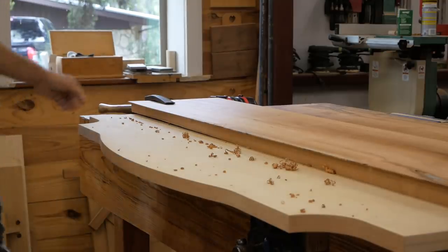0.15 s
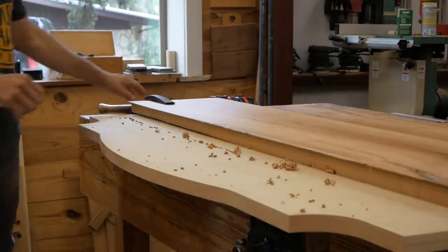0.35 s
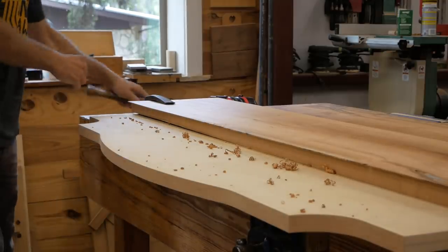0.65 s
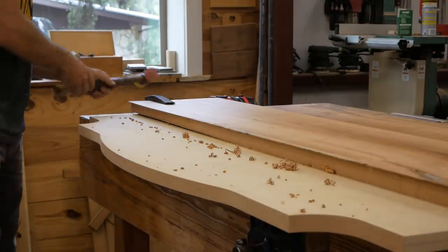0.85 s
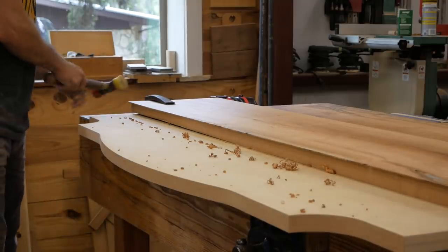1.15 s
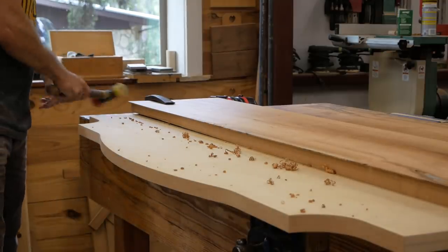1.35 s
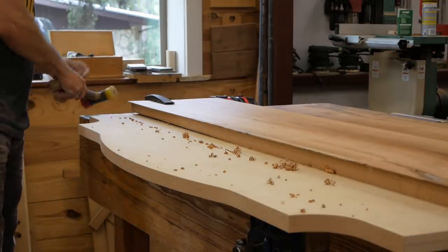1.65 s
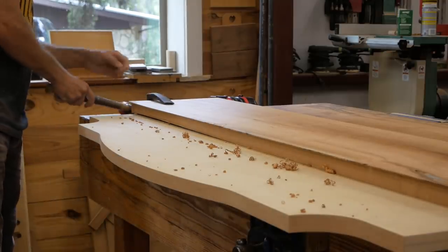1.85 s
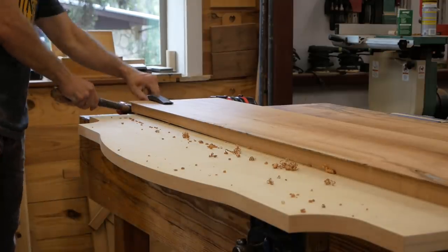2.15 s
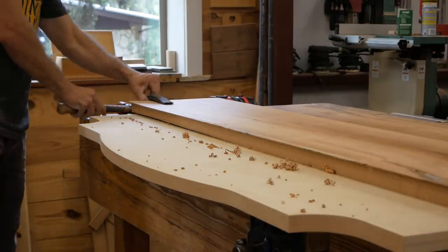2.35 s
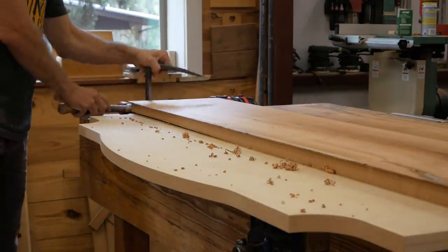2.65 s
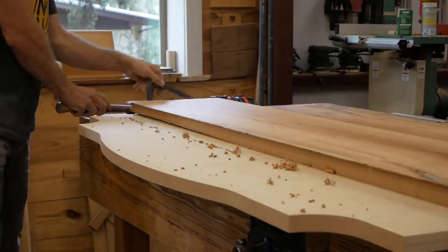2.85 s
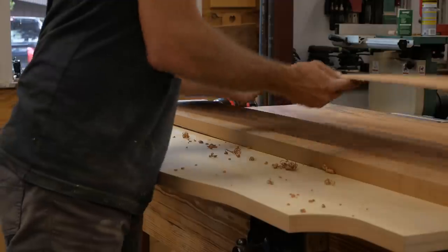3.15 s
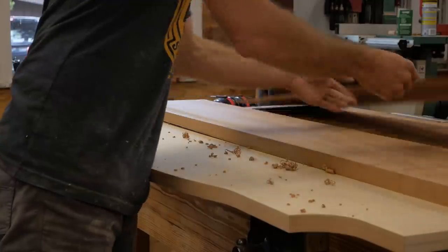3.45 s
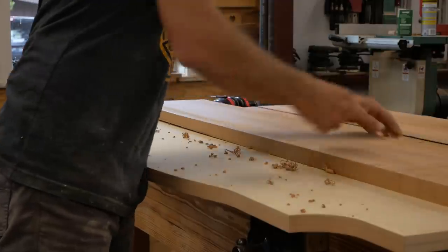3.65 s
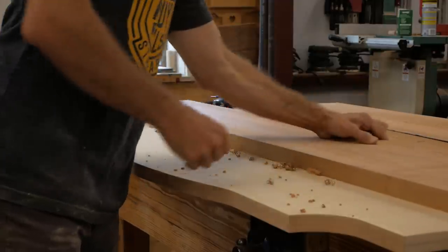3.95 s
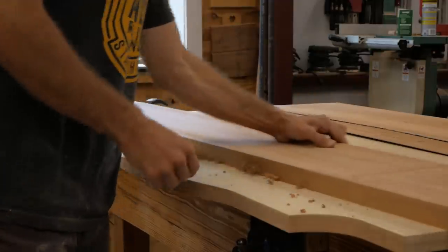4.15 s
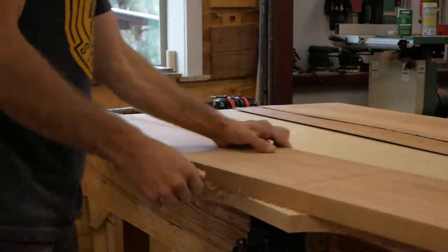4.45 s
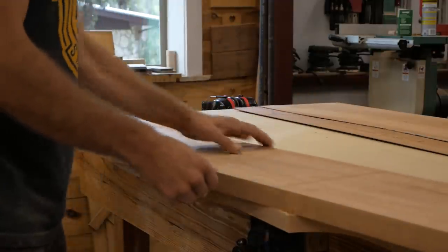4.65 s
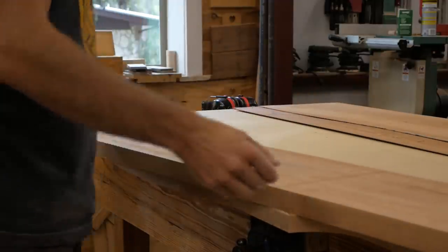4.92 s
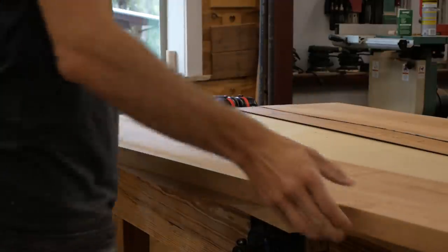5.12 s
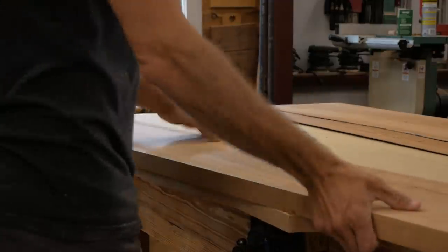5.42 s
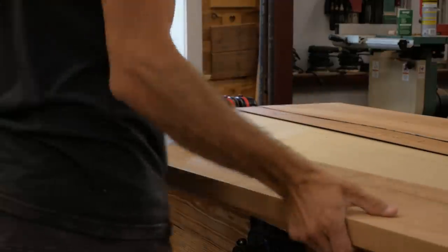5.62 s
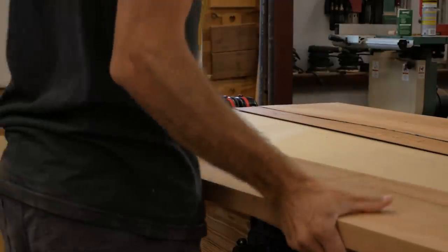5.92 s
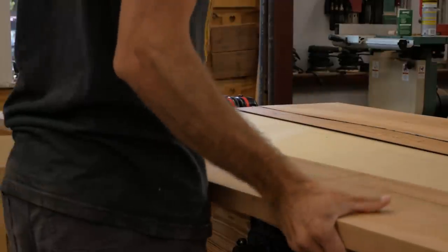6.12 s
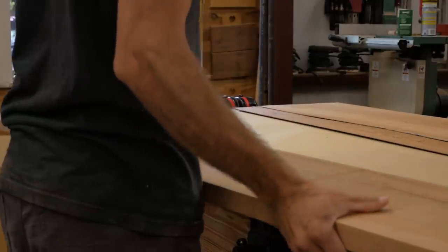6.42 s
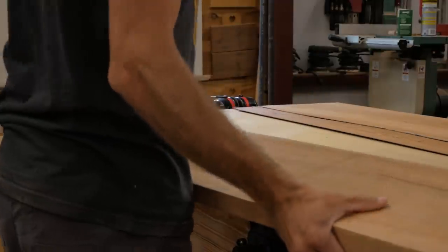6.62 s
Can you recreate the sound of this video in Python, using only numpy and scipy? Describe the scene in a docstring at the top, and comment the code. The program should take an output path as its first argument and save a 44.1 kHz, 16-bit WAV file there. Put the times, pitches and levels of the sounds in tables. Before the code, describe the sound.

A quiet small workshop with a low, soft room hush, heard close and almost centred. From 0 to 0.4 s cloth rustles gently; near 0.6 s a tool is picked up with faint knocks and a low shudder, with more rustling to 1 s. At 1.48 and 1.83 s two heavy mallet blows dominate, hard woody cracks with a delayed thump, slight iron ring and short room tail. Dull knocks cluster at 1.9-2.1 s, then tiny clacks and a faint rattle until 2.85 s as the iron holdfast comes out. Soft contacts follow around 3 s. A thin sheet snaps down at 3.5 s and claps harder at 3.65 s, skidding briefly. From 3.9 to 4.6 s a plank scrapes and judders, with a soft thud at 4.48 s. A light swipe at 4.8 s precedes a stronger, gritty hand swish at 5.1-5.5 s, falling in pitch. Faint rubs near 5.6 and 6.6-6.8 s end it.

```python
"""Two heavy mallet blows ring out in a small woodworking shop, then loose knocks, claps, scrapes, swishes and rustles.
The blows free an iron holdfast, which knocks about in its hole as it is drawn out; struck parts are clicks and fading tones.
A thin wooden sheet is lifted and slaps down, a plank slides on the bench, and a hand sweeps over the dusty wood.
All rubbing, clothes included, is made of tiny random catches that grow with speed. The room adds a short ring."""
import sys
import numpy as np
from scipy import signal
from scipy.fft import irfft
from scipy.io import wavfile
from scipy.ndimage import uniform_filter1d

SR = 44100
rng = np.random.default_rng(int(sys.argv[2]) if len(sys.argv) > 2 else 0)


def bounce(signal):
    """Save signal as a 16-bit WAV file at the path given by the first command-line argument."""
    frames = np.transpose(np.atleast_2d(signal))
    limited = np.clip(frames, -1, 1)
    pcm = np.round(limited * 32767).astype(np.int16)
    wavfile.write(sys.argv[1], SR, pcm)


N = 299030
TIME = np.arange(N) / SR

# Tones of the struck iron holdfast: f/Hz, relative level/dB, time to fade by 60 dB t60/s
IRON_TONES = [(1070, 4, .25), (1251, 4, .27), (1320, -3, .45), (1442, 0, .3), (1521, -1, .33),
              (1921, -5, .38), (2205, -5, .3), (2595, -2, .3), (3941, -10, .38), (4759, -9, .35),
              (5254, -9, .45), (6255, -12, .37), (7413, -7, .62)]
# Tones of the struck bench: f/Hz, relative level/dB, t60/s
BENCH_TONES = [(169, -12, .3), (213, -7, .22), (242, -6, .22), (277, -5, .26), (312, -6, .2),
               (372, -3, .16), (436, -2, .17), (500, -1, .13), (580, -2, .15), (617, -4, .18),
               (657, -6, .16), (712, -5, .2), (781, -7, .18), (935, -13, .18)]
# Spectrum of a dull wooden thud: f/Hz, relative level/dB
THUD_COLOUR = [(30, -45.5), (70, -25), (120, -11.5), (210, 5.5), (430, 5), (700, -2), (950, -20.5),
               (1400, -27.5), (4000, -55.5)]
# Spectrum of a bright wooden clack: f/Hz, relative level/dB
CLACK_COLOUR = [(200, -29), (600, 1), (950, 3.5), (1350, -4), (1800, -1.5), (2800, -7.5), (4000, -20.5),
                (8000, -30), (15000, -37)]
# Spectrum of wood shuddering as it sticks and slips: f/Hz, relative level/dB
JUDDER_COLOUR = [(50, -45), (80, 3.5), (100, -1), (130, -4), (230, -5.5), (290, 1), (335, 7.5), (400, -7),
                 (600, -5), (1500, -91)]


def amp(db):
    """Turns decibels into a gain."""
    return 10 ** (np.asarray(db) / 20)


def read(points, hz):
    """Reads a table between its points, on a log-frequency axis."""
    f, value = np.transpose(points)
    return np.interp(np.log(hz + 1), np.log(f + 1), value)


def evened(x):
    """Scales a sound to an average (rms) level of 1."""
    return x / np.sqrt(np.mean(x ** 2) + 1e-20)


def crested(x):
    """Scales a sound so that its loudest 6 ms have rms 1."""
    power = uniform_filter1d(x ** 2, size=260, mode="constant")
    return x / np.sqrt(power.max() + 1e-20)


def add(mix, s, sound):
    """Mixes a sound in at time s."""
    part = mix[max(round(s * SR), 0):][:len(sound)]
    part += sound[:len(part)]


def click(colour, spread_s=0., size=4096):
    """A click of a given spectrum; as in a bending wave the lows come later, by spread_s at 500 Hz."""
    hz = abs(np.fft.fftfreq(size, 1 / SR))
    log_gain = np.log(amp(read(colour, hz)))
    half = size // 2
    # this choice of phase lets the click start at once, with nothing ahead of it
    spectrum = np.exp(np.conj(signal.hilbert(log_gain)))[:half + 1]
    lag = 4 * np.pi * spread_s * np.sqrt(500 * hz[:half + 1])  # phase in radians
    return irfft(spectrum * np.exp(-1j * lag))[:half]


def tinted(x, colour):
    """Filters a sound with a spectrum."""
    return signal.oaconvolve(x, click(colour))[:len(x)]


def burst(colour, t60, swell_s=0.00057):
    """A contact wakes many close, quickly dying tones, heard as fading noise; a glancing one swells slowly."""
    t = TIME[:SR // 3]
    shape = (1 - np.exp(-t / swell_s)) * amp(-60 * t / t60)
    return crested(tinted(rng.standard_normal(len(t)) * shape, colour))


def ring(tones):
    """A struck body rings freely in its own tones, each fading at its own pace."""
    t = TIME[:SR // 2]
    out = np.zeros(len(t))
    for hz, db, t60 in tones:
        sign = rng.choice([-1, 1])
        out += sign * amp(db - 60 * t / t60) * np.sin(2 * np.pi * hz * t)
    return crested(out)


def friction(colour, per_s, flutter_db):
    """Rubbing is per_s tiny catches a second, of unequal size, made stronger and weaker by fluttering pressure."""
    catches = rng.standard_normal(N) * (rng.random(N) < per_s / SR)
    slow_noise = uniform_filter1d(rng.standard_normal(N), size=600)
    flutter = evened(uniform_filter1d(slow_noise, size=300))
    return evened(tinted(catches * amp(flutter_db * flutter), colour))


def resonate(x, hz, width_hz):
    """A resonance whose pitch follows the curve hz."""
    turn = np.exp(2j * np.pi * np.cumsum(hz) / SR)
    r = np.exp(-np.pi * width_hz / SR)
    # shift the moving pitch down to zero, smooth there, and shift back
    smooth = signal.lfilter([(1 - r) ** 2], [1, -2 * r, r * r], x / turn)
    return (turn * smooth).real


def speed(start, rise_s, fall_s):
    """One movement from rest up to full speed and back to rest, 0 to 1 to 0."""
    turn = np.interp(TIME, [start, start + rise_s, start + rise_s + fall_s], [0, 1, 2])
    return np.sin(np.pi / 2 * np.minimum(turn, 2 - turn))


def swell(middle, length_s):
    """A movement that slows down as gently as it sets off."""
    return speed(middle - length_s / 2, length_s / 2, length_s / 2)


def mallet(face_hz=820, face_db=-10, face_lead_s=.0016):
    """The mallet's face lands softly, then the blow runs through the bench top, crack first and thump after."""
    # Mallet blows: t/s, blow level/dB, iron ring level/dB, bench ring level/dB, clack level/dB
    blows = [(1.4835, -8.5, -30, -23.5, -26.5), (1.8305, -9.5, -44.5, -17, -22)]
    # Spectrum of the blow as it leaves the bench top: f/Hz, relative level/dB
    blow_colour = [(30, -63.5), (70, -43), (110, -21), (220, -13), (440, -1), (700, -8), (1100, -17),
                   (1700, -22.5), (2300, -26), (2700, -18), (3500, -29), (5000, -20), (7200, -27.5),
                   (8200, -41.5), (15000, -51)]
    out = np.zeros(N)
    blow = crested(click(blow_colour, spread_s=.0039))
    t = TIME[:SR // 250]
    face = crested(np.sin(2 * np.pi * face_hz * t) * np.hanning(len(t)))
    for s, db, iron_db, bench_db, clack_db in blows:
        add(out, s - face_lead_s, amp(db + face_db) * face)
        add(out, s, amp(db) * blow)
        add(out, s + .001, amp(iron_db) * ring(IRON_TONES))
        add(out, s + 0.005, amp(bench_db) * ring(BENCH_TONES))
        add(out, s + 0.0022, amp(clack_db) * burst(CLACK_COLOUR, t60=.12))  # loose boards chatter
    return out


def holdfast(bench_db=-8, iron_db=-12, swell_s=.003):
    """As the mallet is picked up and the iron shaft bumps in its hole, glancing knocks wake bench and iron."""
    # Knocks of mallet and loose holdfast on the bench: t/s, thud level/dB, clack level/dB
    knocks = [(0.589, -47.5, -53.5), (.624, -47, -77), (.642, -45, -75), (1.914, -30, -40),
              (1.930, -26.5, -42), (1.97, -36.5, -72), (2.071, -28.5, -49.5), (2.085, -32.5, -52),
              (2.104, -29, -49), (2.263, -52.5, -58), (2.379, -55, -59), (2.488, -52, -55.5),
              (2.602, -51.5, -58.5), (2.701, -42.5, -70), (2.724, -52, -66), (2.827, -55, -53),
              (2.847, -52.5, -55)]
    out = np.zeros(N)
    onset = 1 - np.exp(-TIME[:SR // 2] / swell_s)
    for s, thud_db, clack_db in knocks:
        add(out, s, amp(thud_db) * burst(THUD_COLOUR, t60=0.069, swell_s=swell_s))
        add(out, s, amp(thud_db + bench_db) * ring(BENCH_TONES) * onset)
        add(out, s, amp(clack_db) * burst(CLACK_COLOUR, t60=0.083, swell_s=swell_s))
        add(out, s, amp(clack_db + iron_db) * ring(IRON_TONES) * onset)
    return out


def shaft():
    """The holdfast rattles lightly along the sides of its hole as it is drawn out."""
    # The one pull: start t/s, speeding up/s, slowing down/s, level/dB
    start, rise_s, fall_s, db = (2.55, 0.4, 0.22, -62)
    pull = speed(start, rise_s, fall_s) ** 2
    return amp(db) * pull * friction(CLACK_COLOUR, per_s=900, flutter_db=2.5)


def slaps():
    """Wood or a hand meets wood flat: the board thuds, the faces clap, the thin edge snaps."""
    # Flat contacts: t/s, thud level/dB, clap level/dB, snap level/dB
    contacts = [(2.953, -60, -44, -60.5), (3.107, -56, -49, -64), (3.152, -70, -57, -58.5),
                (3.517, -59, -38, -31.5), (3.529, -57, -39, -28), (3.544, -60, -38, -30),
                (3.631, -53, -65, -41), (3.652, -34.5, -28.5, -32), (3.665, -41, -35, -27.5),
                (4.478, -39.5, -55.5, -77), (4.492, -39.5, -59, -74), (5.223, -57.5, -54, -65),
                (6.71, -80, -54.5, -67)]
    # Spectrum of the clap: f/Hz, relative level/dB
    clap_colour = [(150, -5.5), (500, 2), (900, 3), (2000, 7), (2900, 8), (3700, -4), (5000, -15),
                   (7500, -20), (15000, -42)]
    # Spectrum of the snap: f/Hz, relative level/dB
    snap_colour = [(2000, -26), (5000, -15.5), (8000, -12.5), (10500, -4), (12400, -2.5), (14000, -11),
                   (16000, -9)]
    out = np.zeros(N)
    for s, thud_db, clap_db, snap_db in contacts:
        add(out, s, amp(thud_db) * burst(THUD_COLOUR, t60=0.1))
        add(out, s, amp(clap_db) * burst(clap_colour, t60=0.092))
        add(out, s, amp(snap_db) * burst(snap_colour, t60=0.041))
    return out


def sheet(trim_db=-3, skid_law=1.22):
    """The thin sheet skids on the boards as it is dragged off and settles, louder with speed to a power."""
    # Skids: start t/s, speeding up/s, slowing down/s, level before the trim/dB
    skids = [(2.951, 0.015, 0.12, -52), (3.53, 0.021, .13, -36.5), (3.635, 0.018, 0.12, -35),
             (3.699, 0.12, 0.18, -44.5)]
    # Spectrum of the skid: f/Hz, relative level/dB
    skid_colour = [(410, -34.5), (700, -7), (1480, -12), (1620, -8), (2160, -3), (2700, 5), (3840, -5.5),
                   (4550, -4), (10500, -9.5), (14600, -39), (16000, -27)]
    skid = np.zeros(N)
    for start, rise_s, fall_s, db in skids:
        skid += amp(db) * speed(start, rise_s, fall_s) ** skid_law
    return amp(trim_db) * skid * friction(skid_colour, per_s=11000, flutter_db=0.5)


def plank(scrape_trim_db=-1.0, judder_trim_db=-16, grit_trim_db=-2):
    """Wood drags on wood: a dense scrape, a low judder of the whole plank, and the hiss of trapped dust."""
    # Pushes: start t/s, speeding up/s, slowing down/s, then before the trims: scrape and judder level/dB, grit level/dB
    slides = [(3.909, 0.23, 0.45, -38.5, -51.5), (4.45, 0.036, .24, -44.5, -68),
              (5.53, .12, 0.15, -45, -72), (6.55, 0.024, 0.084, -57, -76), (6.69, 0.027, .12, -63, -71)]
    # Spectrum of the scrape: f/Hz, relative level/dB
    scrape_colour = [(150, -16.5), (300, -1), (460, -2.5), (630, -0.5), (1000, 1), (1500, 1.5), (2100, 2),
                     (2650, 4.5), (3100, -2.5), (3600, -11), (5000, -16.5), (9000, -30)]
    # Spectrum of the gritty dust: f/Hz, relative level/dB
    grit_colour = [(2500, -12), (4500, 0), (7000, -2.5), (10000, -9), (13000, -14.5), (16000, -25)]
    scrape_law, judder_law, grit_law = 1.12, 0.43, 1.9  # each grows as this power of the speed
    scrape, judder, grit = np.zeros((3, N))
    for start, rise_s, fall_s, db, dust_db in slides:
        push = speed(start, rise_s, fall_s)
        scrape += amp(db) * push ** scrape_law
        judder += amp(db) * push ** judder_law
        grit += amp(dust_db) * push ** grit_law
    scrape *= friction(scrape_colour, per_s=8000, flutter_db=0.8)
    judder *= friction(JUDDER_COLOUR, per_s=720, flutter_db=2.5)
    grit *= friction(grit_colour, per_s=12000, flutter_db=0.8)
    return amp(scrape_trim_db) * scrape + amp(judder_trim_db) * judder + amp(grit_trim_db) * grit


def shudders(trim_db=-4, length_s=0.12):
    """Wood sticks, slips and shakes the boards as the mallet is dragged off and the plank is shoved."""
    # Shudders: middle t/s, level before the trim/dB
    fits = [(.635, -42.5), (3.99, -40), (4.16, -42.5), (5.8, -58), (6.77, -58)]
    shake = sum(amp(db) * swell(s, length_s) ** 2 for s, db in fits)
    return amp(trim_db) * shake * friction(JUDDER_COLOUR, per_s=820, flutter_db=1.0)


def sweeping(fizz_trim_db=-2, palm_width_hz=650, palm_sag_hz_per_s=3000, palm_lag=.25):
    """A hand swishes over the grain, dust fizzes, chips catch, and the palm's hollow sinks in pitch as it slows."""
    # Sweeps: start t/s, speeding up/s, slowing down/s, swish level/dB, dust fizz level before the trim/dB,
    # palm level/dB, palm starting pitch f/Hz
    sweeps = [(4.714, 0.054, .16, -53, -68, -52.5, 2150), (5.11, 0.21, .24, -41, -46, -49.5, 2684)]
    # Chips scratching under the hand: middle t/s, length/s, swish level/dB, fizz level before the trim/dB
    scratches = [(4.848, 0.081, -51, -45), (5.302, 0.023, -37, -37.5), (5.36, 0.041, -42, -42)]
    # Spectrum of the swish: f/Hz, relative level/dB
    swish_colour = [(150, -40.5), (400, -16), (900, -15.5), (1700, -10.5), (2200, -7), (2700, 5),
                    (3600, -3.5), (5000, -1.5), (7500, -6.5), (10000, -17), (13000, -20), (16000, -36)]
    # Spectrum of the fizz: f/Hz, relative level/dB
    fizz_colour = [(4000, -22), (7500, -2), (9500, 0), (10800, -4), (12000, -15), (16000, -28)]
    swish_law, fizz_law, palm_law = 2.48, 4.1, 2.6  # each grows as this power of the speed
    swish, fizz, palm = np.zeros((3, N))
    for start, rise_s, fall_s, db, dust_db, palm_db, palm_hz in sweeps:
        hand = speed(start, rise_s, fall_s)
        swish += amp(db) * hand ** swish_law
        fizz += amp(dust_db) * hand ** fizz_law
        hz = palm_hz - palm_sag_hz_per_s * np.clip(TIME - start - rise_s, 0, fall_s)
        # the hollow sounds later than the swish, by a share of the speeding up
        hollow = speed(start + palm_lag * rise_s, rise_s, fall_s) ** palm_law
        tone = evened(resonate(rng.standard_normal(N), hz, palm_width_hz))
        palm += amp(palm_db) * hollow * tone
    for s, length_s, db, dust_db in scratches:
        catch = swell(s, length_s) ** 2
        # hypot adds the powers
        swish = np.hypot(swish, amp(db) * catch)
        fizz = np.hypot(fizz, amp(dust_db) * catch)
    swish *= friction(swish_colour, per_s=13000, flutter_db=1.5)
    fizz *= friction(fizz_colour, per_s=8600, flutter_db=3.5)
    return swish + amp(fizz_trim_db) * fizz + palm


def clothes(trim_db=-2, rustle_law=1.8):
    """Fabric rubs on fabric with each arm movement, louder with the arm's speed to a power."""
    # Rustles: middle t/s, length/s, level before the trim/dB
    rustles = [(0.076, 0.21, -50.5), (0.187, 0.1, -49), (0.274, .16, -47.5), (0.368, 0.26, -58),
               (0.557, 0.28, -55), (0.765, 0.37, -51.5), (1.003, .14, -71), (1.23, 0.41, -63.5),
               (2.523, 0.24, -68.5), (2.869, 0.23, -65.5), (3.146, 0.11, -59), (3.402, 0.15, -62.5),
               (4.3, .26, -48), (4.691, 0.17, -58.5), (5.065, 0.25, -67.5), (5.83, 0.17, -67)]
    # Spectrum of rubbing cloth: f/Hz, relative level/dB
    cloth_colour = [(530, -47), (900, -20), (1530, -17), (1700, -11.5), (2330, -4.5), (2600, 1),
                    (3430, -6.5), (3730, -5), (4410, -9), (4800, -7.5), (6640, -11.5), (11600, -13.5),
                    (14900, -24), (16000, -25.5)]
    rub = sum(amp(db) * swell(s, length_s) ** rustle_law for s, length_s, db in rustles)
    return amp(trim_db) * rub * friction(cloth_colour, per_s=14000, flutter_db=0.82)


def specks():
    """Specks of dust make tiny dry ticks: very short bursts of noise."""
    # Ticks: t/s, level/dB
    ticks = [(1.132, -65.5), (2.566, -66), (2.744, -65), (5.104, -60), (5.96, -64), (6.187, -63.5)]
    # Spectrum of a tick: f/Hz, relative level/dB
    tick_colour = [(1000, -14), (3000, 0), (7000, -1), (16000, -6)]
    out = np.zeros(N)
    for s, db in ticks:
        add(out, s, amp(db) * burst(tick_colour, t60=0.012))
    return out


def air(hush_db=-64, hiss_hz=2680, width_hz=520, hiss_db=-74):
    """The steady hush of the still shop is filtered noise, with a narrow band of hiss in it."""
    # Spectrum of the hush: f/Hz, relative level/dB
    hush_colour = [(15, -62.5), (25, -29.5), (70, -5), (149, -3.5), (185, -3.5), (326, -11), (394, -7.5),
                   (489, -11), (754, -13), (1560, -21), (2690, -35), (2990, -37.5), (8360, -34),
                   (9070, -33), (16000, -41)]
    hush = evened(tinted(rng.standard_normal(N), hush_colour))
    b, a = signal.iirpeak(hiss_hz, hiss_hz / width_hz, SR)
    hiss = evened(signal.lfilter(b, a, rng.standard_normal(N)))
    return amp(hush_db) * hush + amp(hiss_db) * hiss


def room(x, first_s=0.0063):
    """The room answers with dense reflections of random sign, each band dying at its own speed."""
    # How long the ring takes to fade by 60 dB: f/Hz, t60/s
    room_t60 = [(100, 1.08), (260, 0.3151), (700, 0.3036), (1800, 0.46), (2800, 0.7155), (5000, 0.64),
                (12800, 0.9)]
    # Spectrum of the ring: f/Hz, gain/dB
    room_colour = [(100, 1), (450, -1), (1100, 3.5), (2000, -3), (2750, 0), (3600, -3.5), (6000, -8),
                   (12000, -7.5)]
    signs = rng.choice([-1., 1.], SR)
    taps = signs * (rng.random(SR) < 4000 / SR) * (TIME[:SR] > first_s)  # about 4000 reflections a second
    hz, t, bands = signal.stft(taps, SR, nperseg=256)
    bands = bands * amp(-60 * t / read(room_t60, hz)[:, None])
    tail = signal.istft(bands, SR, nperseg=256)[1]
    return signal.fftconvolve(x, tinted(tail / np.linalg.norm(tail), room_colour))[:N]


def scene(blow_room_db=-5, knock_room_db=-4, rub_room_db=-6, bass_hz=85, noise_db=-82):
    """All sources with their share of the room, almost the same in both channels."""
    # How much of the reflections differs between left and right: f/Hz, gain/dB
    width = [(60, -26), (300, -36.5), (700, -35.5), (1500, -30), (4000, -30.5), (12000, -30)]
    # Spectrum of a faint steady noise: f/Hz, relative level/dB
    noise_colour = [(30, 8.5), (100, 5), (300, 2), (700, 2.5), (2500, -2.5), (6000, 0.5), (12000, 0),
                    (15000, -9.5)]
    blows = mallet()
    knocks = holdfast() + slaps()
    rubs = shaft() + shudders() + plank() + sheet() + sweeping() + clothes() + specks()
    wet = room(amp(blow_room_db) * blows + amp(knock_room_db) * knocks + amp(rub_room_db) * rubs)
    # the deep bass below bass_hz is cut away
    bass_cut = signal.butter(2, bass_hz, "highpass", fs=SR, output="sos")
    work = signal.sosfilt(bass_cut, blows + knocks + rubs + wet)
    mid = work + air()
    # faint reflections and a faint steady noise, opposite in left and right
    noise = evened(tinted(rng.standard_normal(N), noise_colour))
    side = tinted(room(mid), width) + amp(noise_db) * noise
    return mid + np.array([side, -side])


def record(dry, edge_hz=16200):
    """Peaks are cut off at full scale, then the treble above edge_hz is removed."""
    limited = np.clip(dry, -1, 1)
    lowpass = signal.firwin(511, edge_hz, window=("kaiser", 9), fs=SR)
    return signal.oaconvolve(limited, lowpass[None], "same")


dry = scene()
out = record(dry)
bounce(out)
```